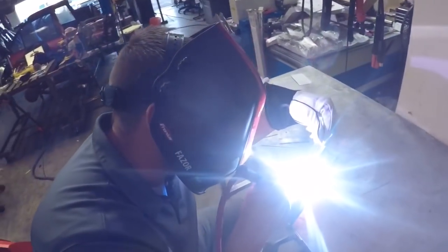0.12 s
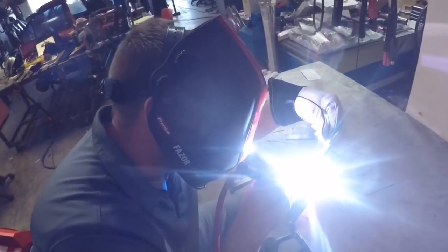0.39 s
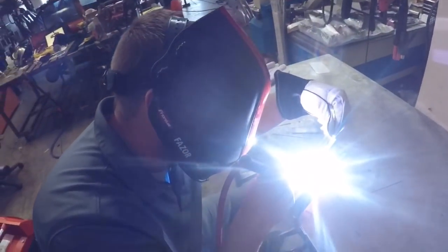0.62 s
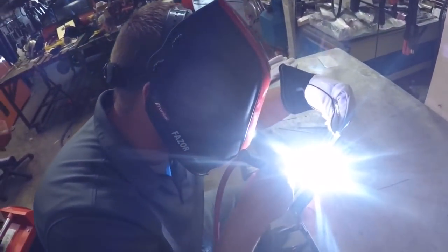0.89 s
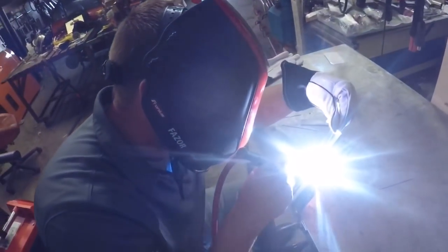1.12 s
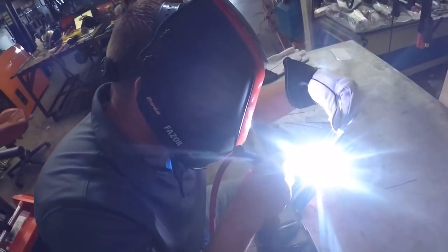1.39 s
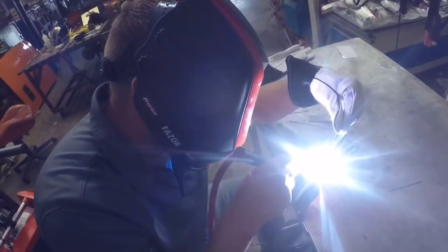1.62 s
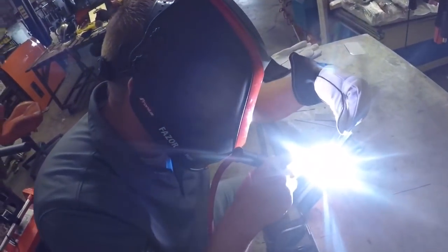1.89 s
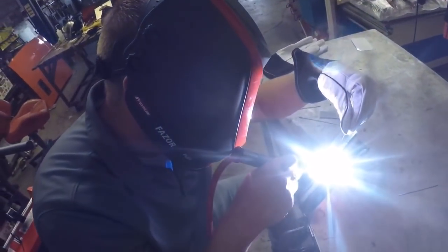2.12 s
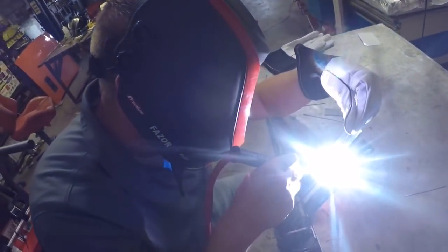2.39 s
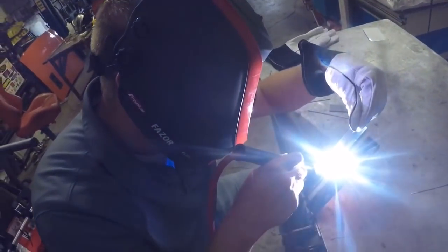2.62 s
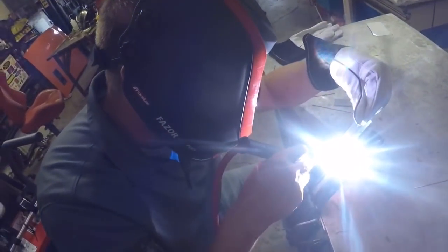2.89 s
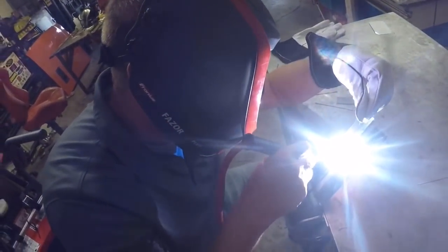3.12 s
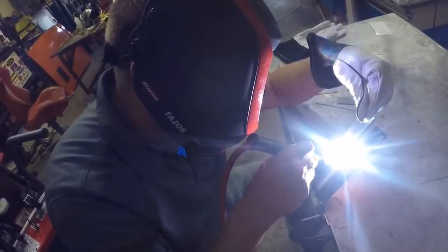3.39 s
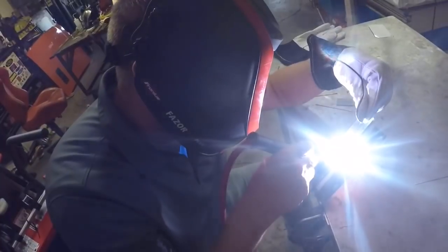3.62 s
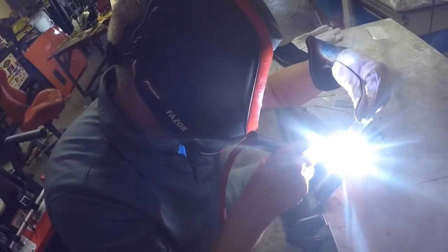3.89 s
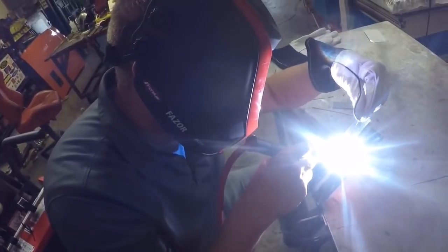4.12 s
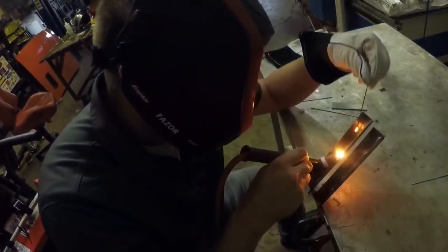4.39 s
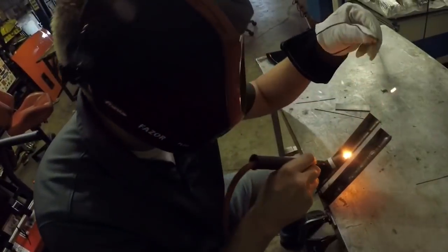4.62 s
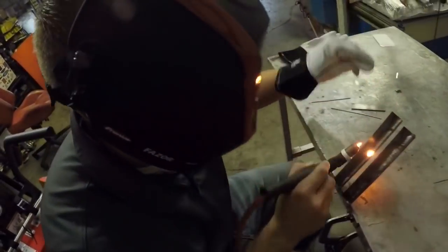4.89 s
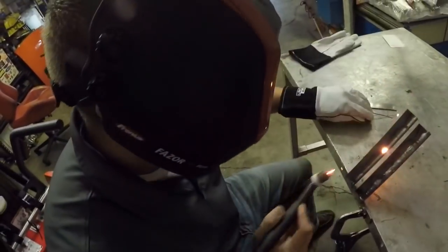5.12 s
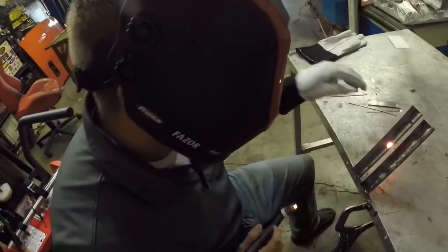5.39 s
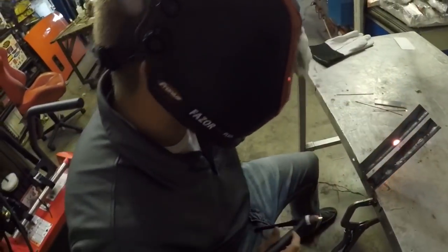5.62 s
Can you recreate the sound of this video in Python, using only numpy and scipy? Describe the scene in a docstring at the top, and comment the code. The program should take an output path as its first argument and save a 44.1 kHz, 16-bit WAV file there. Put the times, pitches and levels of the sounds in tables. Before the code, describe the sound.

Close small-camera sound of welding: a faint, whistly hiss over fan and machine hum, with light low breeze and soft scuffs at first. A deep gust arrives, and the image widens to stereo with uneven left-heavy buffeting, brief lulls and pressure thumps. Late on, the hiss cuts off in two stages, then a filler rod bounces on metal in rapid ticks and small high rings.

```python
"""A welding arc and its shielding gas hiss, as wandering resonances of noise, over a humming workshop.
The arc dies, the gas stops, and a filler rod rattles onto the steel bench in clicks, noise and rings.
A small camera stands in a draught: low noise rumbles and falling chirps thump on its ports.
It fades from one sheltered microphone to a stereo pair; soft scuffs and a faint whine pass by."""
import sys
import numpy as np
from scipy import signal
from scipy.fft import rfft, irfft, next_fast_len
from scipy.io import wavfile
from scipy.ndimage import uniform_filter1d

SR = 44100
rng = np.random.default_rng(int(sys.argv[2]) if len(sys.argv) > 2 else 0)


def master(y):
    """Save y as 16-bit WAV."""
    cut = np.clip(np.atleast_2d(y).T, -1, 1)
    pcm = np.round(cut * 32767)  # scale
    wavfile.write(sys.argv[1], SR, pcm.astype(np.int16))


def undo_db(level):
    """Turn decibels back into plain size, where 20 dB means ten times bigger."""
    steps = np.asarray(level, float) / 20
    return 10 ** steps


N = 253607
T = np.arange(N) / SR
HZ = np.maximum(np.arange(next_fast_len(N) // 2 + 1) * SR / next_fast_len(N), 1)
FADE_FROM_S, FADE_TO_S = 1.25, 2.64  # sheltered microphone to stereo pair

# colour of the deep draught, on the left port and in the sheltered gust: freq_hz, relative level_db
GUST_LEFT = [(12, -5), (25, 2), (40, -2), (60, -9.5), (90, -11.5), (130, -19.5), (200, -34), (400, -79)]


def over_hz(table, column=1):
    """A table column read at every frequency, on a log axis."""
    table = np.array(table)
    return np.interp(np.log(HZ), np.log(table[:, 0]), table[:, column])


def over_time(table, column=1):
    """A table column read at every sample."""
    table = np.array(table)
    return np.interp(T, table[:, 0], table[:, column])


def shape(x, gain):
    """Filter by a gain per frequency."""
    size = next_fast_len(N)
    return irfft(rfft(x, size) * gain, size)[..., :N]


def noise(gain, count=3):
    """Unrelated noises of one colour, rms 1."""
    x = shape(rng.standard_normal((count, N)), gain)
    return x / x.std(axis=1, keepdims=True)


def walk(rate):
    """Random levels held 1 / rate s and slewed twice; spread about 0.75."""
    hold = int(SR / rate)
    steps = np.repeat(rng.standard_normal(N // hold + 1), hold)
    return uniform_filter1d(uniform_filter1d(steps, hold), hold)[:N]


def fade(from_s, db_per_s):
    """0 dB until from_s, then falling steadily."""
    return -db_per_s * np.maximum(T - from_s, 0)


def bump(s, length):
    """A bell of height 1 around s."""
    return np.exp(-((T - s) / length) ** 2)


def hum():
    """Fans and machines far off; the bass wavers more than the treble."""
    # colour: freq_hz, relative level_db
    hum_colour = [(100, -1.5), (250, -2), (340, -5.5), (415, -3), (447, 3), (480, -2), (560, -6),
                  (620, -9.5), (800, -12), (1250, -19), (2100, -20.5), (3400, -19.5), (4800, -26.5),
                  (7800, -29), (8500, -35), (10500, -43.5), (12500, -48), (15000, -52)]
    # level of the band from 800 to 2000 Hz, before the wavering: time_s, level_db
    hum_level = [(0, -44), (.6, -43.5), (1.3, -45), (2.85, -44.5), (3.2, -48.5), (3.9, -49), (4.45, -47),
                 (5.75, -48)]
    sound = noise(undo_db(over_hz(hum_colour)))
    sound = sound / shape(sound, (HZ > 800) & (HZ < 2000)).std()
    low = 1 / (1 + (HZ / 660.0) ** 4)
    bass = shape(sound, low) * undo_db(2.7 * walk(14))
    treble = shape(sound, 1 - low) * undo_db(1.6 * walk(14))
    return (bass + treble) * undo_db(over_time(hum_level))


def whine():
    """A faint low tone, as of a motor far off, holds for a moment, wavering a little."""
    from_s, to_s, edge_s = 3.78, 4.7, 0.049
    pitch_hz, level_db = 359, -47
    gate = np.clip(np.minimum(T - from_s, to_s - T) / edge_s, 0, 1)
    turn = 2 * np.pi * np.cumsum(pitch_hz * (1 + 0.0034 * walk(10))) / SR
    return undo_db(level_db + 1.5 * walk(42)) * gate * np.sin(turn)


def scuffs():
    """Cloth or glove dragging for a moment: bell-shaped swells of dull noise."""
    # short soft scuffs: centre_s, level_db, length_s
    scuff_times = [(0.246, -26.5, 0.026), (0.532, -27, 0.018), (0.99, -34, 0.023), (4.187, -25, 0.022),
                   (4.292, -34, 0.0098)]
    # their colour: freq_hz, relative level_db
    scuff_colour = [(150, -4), (330, 0.5), (520, 2.5), (750, -20.5), (1200, -19.5), (3000, -23),
                    (7000, -28), (10000, -43), (14000, -62)]
    swell = sum(undo_db(db) * bump(s, length) for s, db, length in scuff_times)
    return noise(undo_db(over_hz(scuff_colour))) * swell


def gusts(table, db, rough_db):
    """Eddies on one port, in quick uneven puffs; they carry little treble."""
    no_treble = 1 / (1 + (HZ / 1200) ** 4)
    eddies = noise(undo_db(over_hz(table)) * no_treble, count=1)[0]
    return eddies * undo_db(db + rough_db * walk(30))


def shelter():
    """Draught on the sheltered microphone: a light rising breeze, then one deep gust and its wake."""
    # colour of the breeze: freq_hz, relative level_db
    breeze_colour = [(12, 4), (40, 2.5), (80, -0.5), (130, 6), (250, -8), (400, -10.5), (800, -40)]
    # colour of the fluttering that stays after the gust: freq_hz, relative level_db
    wake_colour = [(12, -13), (60, 2), (110, 2), (150, -9.5), (200, -14), (400, -45)]
    start_db, rise_db_per_s = -36.5, 2
    puff_s, puff_db, puff_length_s = 0.74, 6, 0.02  # one puff above the breeze
    blast_s, blast_db, attack_s, hold_s, fall_db_per_s = 1.445, -21, 0.024, 0.17, 273
    breeze_db = start_db + rise_db_per_s * T + walk(6.56) + puff_db * bump(puff_s, puff_length_s)
    breeze = gusts(breeze_colour, breeze_db, rough_db=1.5)
    blast = gusts(GUST_LEFT, blast_db + fade(blast_s + hold_s, fall_db_per_s), rough_db=2.0)
    wake = gusts(wake_colour, -30.5, rough_db=0.5)
    return breeze + (blast + wake) * np.clip((T - blast_s) / attack_s, 0, 1)


def draught(db, sag_db_per_s, wander_db):
    """Level in dB on one port of the pair: slowly easing, wandering, dropping in the lulls."""
    # the draught drops at once and comes back: start_s, depth_db, hold_s, recovery_s
    lull_times = [(2.843, -8.5, 0.04, 0.02), (3.118, -15, 0.1, 0.04), (3.635, -9, 0.024, 0.19)]
    lulls = 0
    for s, depth_db, hold, recovery in lull_times:
        drop_in = np.clip((T - s) / 0.011, 0, 1)
        lulls = lulls + depth_db * drop_in * np.exp(-np.maximum(T - s - hold, 0) / recovery)
    return db + fade(FADE_FROM_S, sag_db_per_s) + wander_db * walk(5.4) + lulls


def left_draught():
    """Buffeting on the left port, whose membrane stiffens under the widest swings."""
    buffet = gusts(GUST_LEFT, draught(-13, sag_db_per_s=0.72, wander_db=0.8), rough_db=1.0)
    limit = undo_db(-7)
    return limit * np.tanh(buffet / limit)


def right_draught():
    """Weaker buffeting on the right port, without the slow wander."""
    # colour: freq_hz, relative level_db
    right_colour = [(12, -6), (28, 3), (50, 4), (90, 3), (130, 5), (180, -11.5), (300, -17.5), (600, -50)]
    return gusts(right_colour, draught(-26, sag_db_per_s=0.68, wander_db=0), rough_db=0.5)


def thumps():
    """A pressure step comes out as a falling chirp, every swing about three times as long as the last."""
    # sudden pressure steps on the left port: time_s, peak_db, sharpness_ms, push +1 or pull -1
    pressure_steps = [(1.783, -4.5, 1.5, 1), (3.1202, -6.5, 1.6, -1), (3.214, -9.5, 0.7, 1),
                      (3.5975, -10.5, 0.94, -1), (3.6323, -11, 1.2, 1), (3.6473, -10, 1.13, 1),
                      (4.9073, -8.5, 0.17, -1), (5.0223, -7.5, 1.8, 1), (5.0502, -9, 1.25, 1),
                      (5.0722, -13, 0.55, -1), (5.1188, -12.5, 0.26, -1)]
    chirp = np.zeros(N)
    for s, db, sharp_ms, sign in pressure_steps:
        onset = sharp_ms / 3500  # s, softens the start
        after = onset * np.logaddexp(0, (T - s) / onset)
        swing = np.sin(2 * np.pi * 0.3 * np.log2(1 + 1000 * after / sharp_ms))
        chirp += np.sign(sign) * undo_db(db) * swing * np.exp(-(after / 0.014) ** 2)
    return chirp


def thump_leak(chirp):
    """The pair's processing leaks the upper part of each thump to the right, inverted and late."""
    lag_s = 0.00012
    late = np.exp(-2j * np.pi * HZ * lag_s)
    return -undo_db(-4.5) * shape(chirp, late / (1 + (430.0 / HZ) ** 4))


def flutter():
    """Brief low buzzes: the ports flutter against each other near one pitch."""
    # buzzes: centre_s, level_db on the right port, length_s
    buzz_times = [(3.567, -21, 0.014), (3.61, -31, 0.011), (3.655, -27, 0.012), (3.68, -28, 0.014)]
    pitch_hz = 221
    swell = sum(undo_db(db) * bump(s, length) for s, db, length in buzz_times)
    return swell * np.sin(2 * np.pi * np.cumsum(pitch_hz * (1 + 0.037 * walk(40))) / SR)


def rod():
    """Each bounce is a ring, a click and a rattle of small contacts; harder ones click more, brighter."""
    # the rod bounces on the bench: time_s, hit strength_db, ring peak_db
    bounce_times = [(5.0524, -20, -32), (5.054, -21, -29), (5.059, -27, -45), (5.075, -34, -45),
                    (5.0916, -36, -39), (5.1, -41, -43), (5.1250, -23, -29), (5.1298, -26, -22.5),
                    (5.138, -30, -44), (5.153, -37, -42), (5.166, -34, -41), (5.191, -22, -29),
                    (5.201, -22, -40), (5.204, -31, -41), (5.2122, -39, -39), (5.2225, -40, -46),
                    (5.2426, -24, -39), (5.257, -22.5, -31), (5.2665, -26, -40), (5.298, -23.5, -44),
                    (5.3233, -26, -36), (5.368, -34, -41), (5.3779, -32, -37.5)]
    # colour of the contacts: freq_hz, relative level_db
    rod_colour = [(1000, -10), (2500, -10.5), (4500, -8), (5800, -7), (6350, -1), (6900, 0), (7600, -4),
                  (10000, -9.5), (14000, -18), (15500, -36)]
    ring_hz, ring_rise_s, click_decay_s = 6440, 0.00056, 0.0018
    rattle_decay_s = np.array([[0.022], [0.025]])  # body, treble
    swell, clicks, ring = np.zeros((2, 1, N)), np.zeros((2, 1, N)), np.zeros(N)
    contacts = undo_db(2.1 * walk(600))
    detunes = rng.standard_normal(len(bounce_times))
    for (s, hit_db, ring_db), detune in zip(bounce_times, detunes):
        after = np.maximum(T - s, 0)
        ring_swell = after / ring_rise_s * np.exp(1 - after / ring_rise_s)
        ring += undo_db(ring_db) * ring_swell * np.sin(2 * np.pi * ring_hz * (1 + 0.016 * detune) * after)
        # two rows: body, and treble that grows faster with the hit
        force = undo_db([[hit_db], [hit_db + 0.54 * (hit_db + 17.5)]]) * (T >= s)
        clicks[:, 0] += force * undo_db(1.5 * (hit_db + 20.5) - 10.5) * np.exp(-after / click_decay_s)
        # weak bounces are more rattle than click
        rattle = undo_db(-24.5 - 0.5 * (hit_db + 20.0)) * contacts
        swell[:, 0] += force * rattle * np.exp(-after / rattle_decay_s)
    gain = undo_db(over_hz(rod_colour))
    gain = gain / np.sqrt(np.mean(gain ** 2))
    body = 1 / (1 + (HZ / 8500) ** 8)
    blows = (clicks + swell) * rng.standard_normal((3, N))
    return ring + shape(blows[0], gain * body) + shape(blows[1], gain * (1 - body))


def hiss(resonances, db):
    """Turbulence excites each resonance, which wanders and flickers alone; the whole jet flutters."""
    out = 0
    for hz, width, peak_db, db_per_s in resonances:
        turn = 2 * np.pi * np.cumsum(hz * (1 + 0.008 * walk(2.5))) / SR
        # slow noise on a wandering carrier makes a band of noise around it
        slow = noise(1 / (1 + (2 * HZ / width) ** 2), count=6)
        band = (slow[:3] * np.cos(turn) + slow[3:] * np.sin(turn)) * np.sqrt(width)
        flicker_db = 1.33 * walk(12) + 0.94 * walk(2.46)
        out = out + band * undo_db(peak_db + db_per_s * T + flicker_db)
    return out / out.std() * undo_db(db + 0.24 * walk(24.4))


def torch():
    """Arc and gas swell together; the arc goes out first, the gas flows on a little."""
    # resonances of the arc: centre_hz, width_hz, relative peak_db, change_db_per_s
    arc_resonances = [(1230, 190, -3, -0.5), (1692, 300, -7, 0), (2370, 325, -5.5, 0.5), (2724, 280, 0, 0),
                      (3074, 190, 0, -0.75), (3385, 260, 0.5, 0.1), (5790, 230, -12, 0),
                      (6040, 210, -19.5, 2), (6890, 1100, -23, 2), (8900, 1570, -23.5, 0.5)]
    # resonances of the gas: centre_hz, width_hz, relative peak_db, change_db_per_s
    gas_resonances = [(3395, 650, -4, -0.057), (3870, 210, 2, -0.63), (4132, 140, 2.5, -0.00094),
                      (4415, 310, -2.5, 0.45), (6510, 870, -13, 0.18)]
    # level of the arc, which the gas follows lower down: time_s, level_db
    torch_level = [(0, -41), (.3, -41.5), (1.0, -40), (1.25, -42.5), (1.5, -39.5), (1.7, -43),
                   (1.95, -39.5), (2.3, -41.5), (2.6, -42), (2.85, -41), (3.08, -37.5), (3.16, -40),
                   (3.3, -47.5), (3.55, -42), (3.72, -44), (3.9, -44), (4.1, -41.5), (4.3, -46.5),
                   (4.5, -43), (4.7, -46)]
    arc_out_s, arc_fade_db_per_s = 4.3, 97
    gas_off_s, gas_fade_db_per_s, gas_against_arc_db = 4.8, 75, -4.5
    db = over_time(torch_level)
    arc = hiss(arc_resonances, db + fade(arc_out_s, arc_fade_db_per_s))
    gas = hiss(gas_resonances, db + gas_against_arc_db + fade(gas_off_s, gas_fade_db_per_s))
    return arc + gas


def ports(lone, right, stray):
    """Airborne sound at three ports: the left shares part of the right's sound and hears the rest alone."""
    # against the right port: freq_hz, left_db, sheltered_db, left-right likeness 0-1, lead of left_rad
    port_response = [(88, 2.5, 0.5, 0.6, -0.5), (266, -6, -2, 0.95, 1.0), (478, -1.5, -8, 0.91, 2.5),
                     (570, -0.5, -6.5, 0.94, 3), (920, -5.5, -3.5, 0.07, 2.5), (1106, -0.5, -3, 0.54, 5.5),
                     (1730, 0, 1, 0.2, 6.5), (2300, 0, -2, 0.63, 4.5), (2720, -6.5, -2.5, 0.8, 6),
                     (2970, -1, 2, 1, 5), (3330, -1, -3, 0.87, 6.5), (3700, -3, 1, 0.8, 7),
                     (3920, -4.5, -5.5, 1, 6.5), (4000, 1.5, -1, 1, 7.5), (4280, 1, -2, 0.91, 7),
                     (5120, 7.5, -7.5, 0.77, 3.5), (5280, -2, -11.5, 0.9, 5.5), (6400, 11.5, -8.5, 0, 7.5),
                     (7030, 9, -7, 0.43, 3), (8300, 0.5, -4.5, 0, 2.5), (12100, 4, 0.5, 0.33, -4.5)]
    like = np.clip(over_hz(port_response, column=3), 0, 1)
    lead = np.exp(1j * over_hz(port_response, column=4))
    left = shape(right, like * lead) + shape(stray, np.sqrt(1 - like ** 2))
    left = shape(left, undo_db(over_hz(port_response, column=1)))
    lone = shape(lone, undo_db(over_hz(port_response, column=2)))
    return lone, left, right


def scene():
    """Airborne sound reaches the ports; the draught shakes each; the camera fades at equal power."""
    lone, left, right = ports(*(hum() + torch() + rod() + scuffs() + whine()))
    lone = lone + shelter()
    chirp = thumps()
    buzz = flutter()
    left = left + left_draught() + chirp - undo_db(-1.5) * buzz
    right = right + right_draught() + thump_leak(chirp) + buzz
    turn = np.pi / 2 * np.clip((T - FADE_FROM_S) / (FADE_TO_S - FADE_FROM_S), 0, 1)
    return np.cos(turn) * lone + np.sin(turn) * np.array([left, right])


def top_cut(x):
    """Nothing passes above the cut-off."""
    return signal.sosfilt(signal.butter(12, 15130, fs=SR, output="sos"), x)


def record(dry):
    """The camera rounds off the loudest swings."""
    mix = np.tanh(1.086 * dry) / 1.132
    return top_cut(mix)


dry = scene()
out = record(dry)
master(out)
```